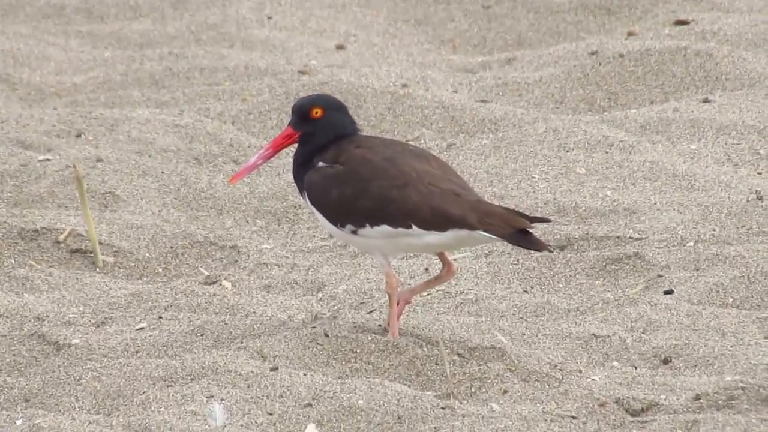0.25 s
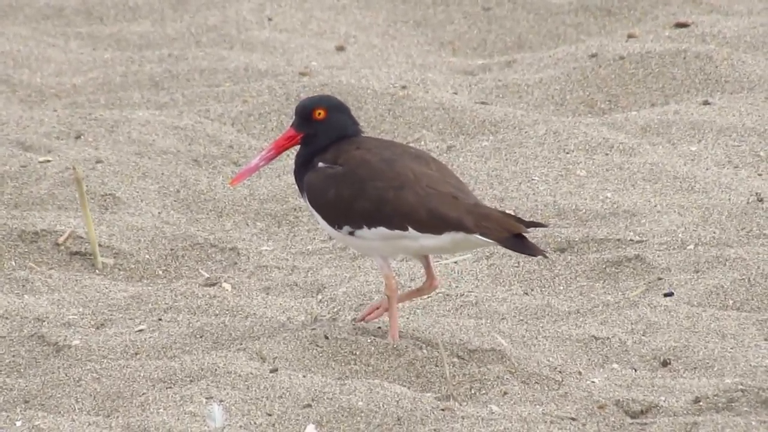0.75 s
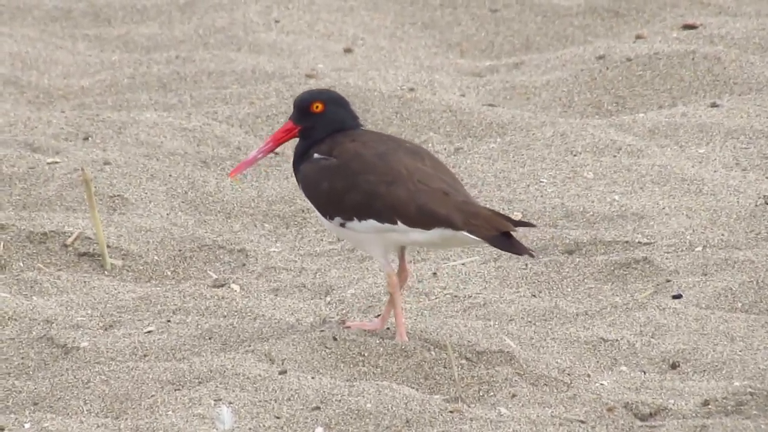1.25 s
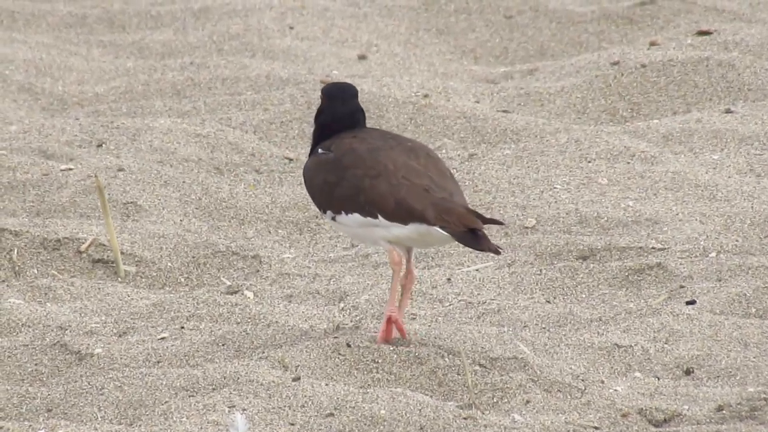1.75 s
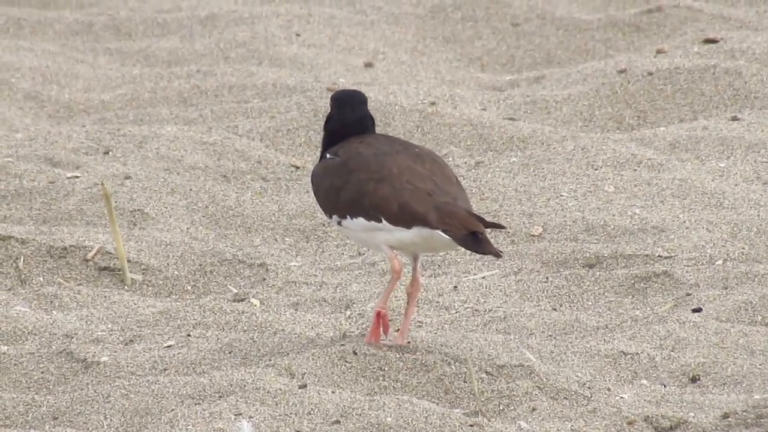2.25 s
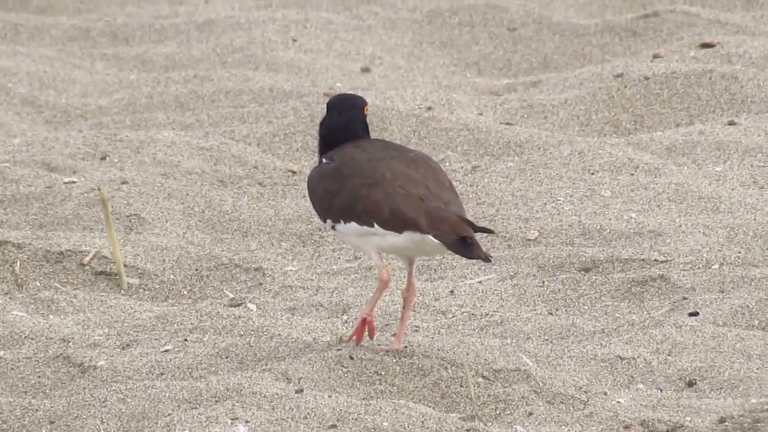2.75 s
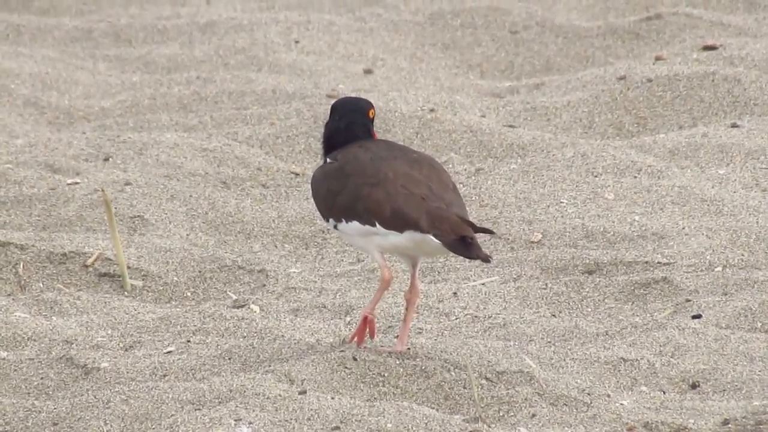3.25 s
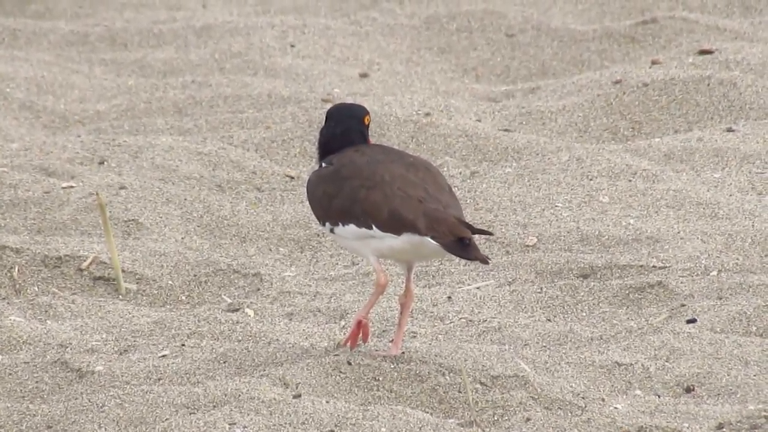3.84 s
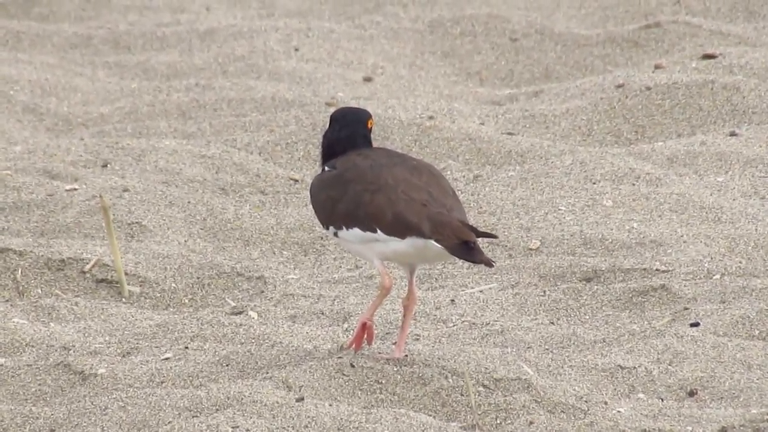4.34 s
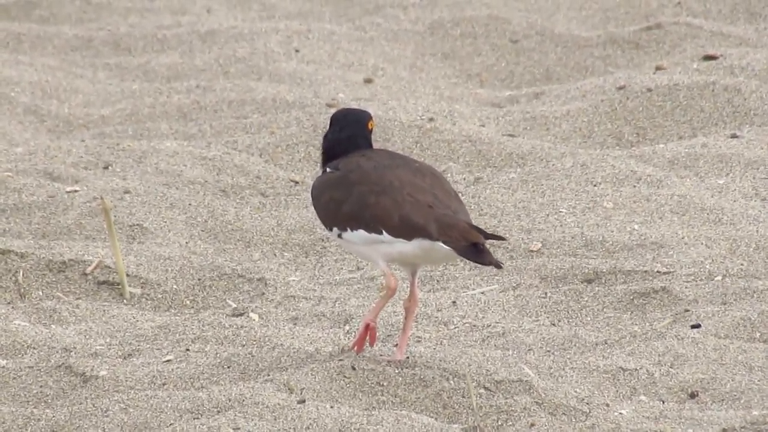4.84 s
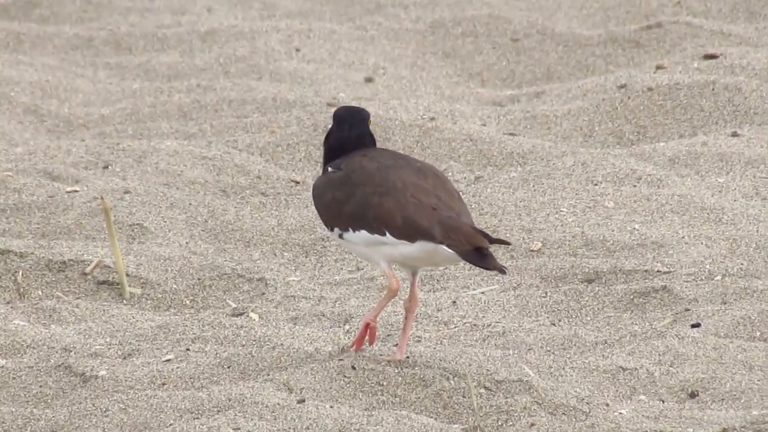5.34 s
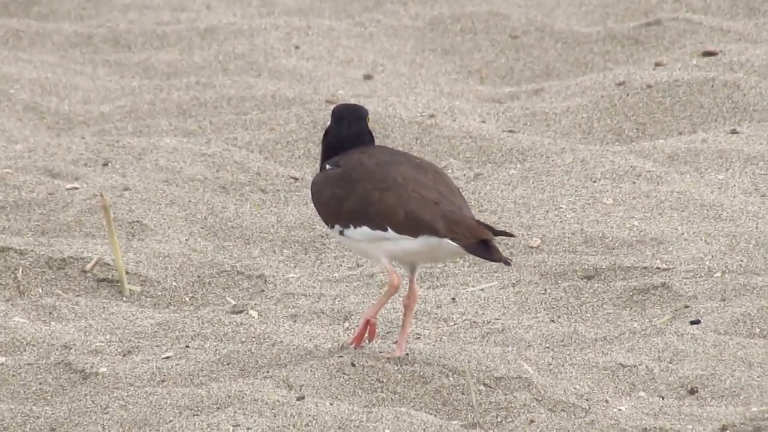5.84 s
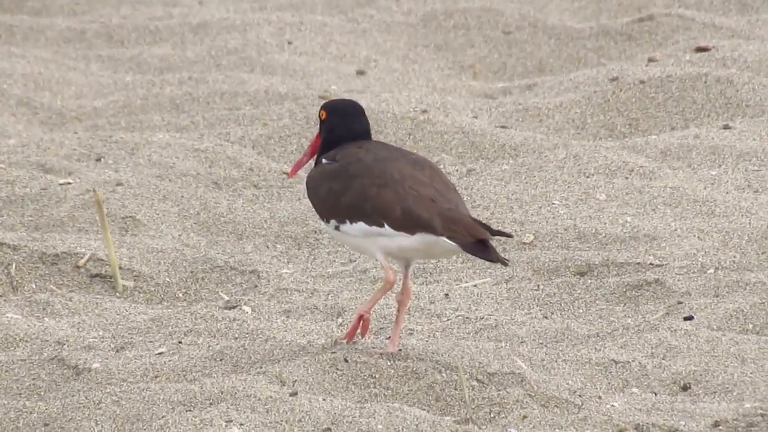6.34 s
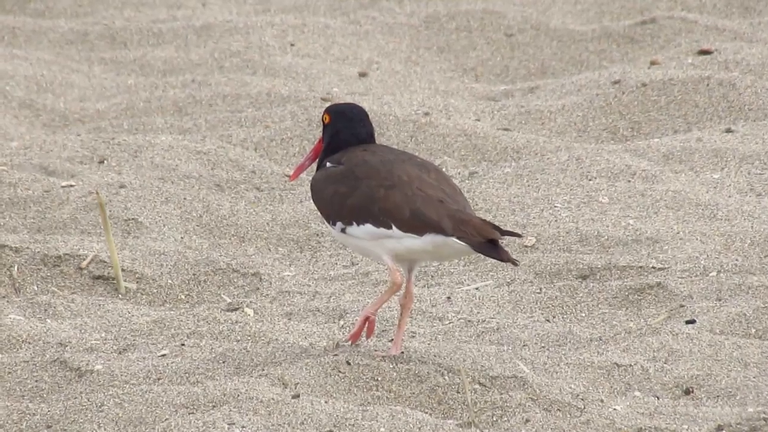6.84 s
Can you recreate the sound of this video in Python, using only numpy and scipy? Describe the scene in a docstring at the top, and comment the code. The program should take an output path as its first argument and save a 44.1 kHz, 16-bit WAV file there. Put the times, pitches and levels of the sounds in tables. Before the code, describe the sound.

Shorebirds give loud piping whistles over gusty wind rumbling on the microphone and a faint wash of surf.

```python
"""A windy beach, stereo microphone out in the open. Oystercatchers pipe close by: eight loud whistles,
each breaking out of a low creak and dropping back into a low sigh. Further along the shore, birds answer
with short pips, thin whistles and a climbing trill. Wind buffets the microphone over a wash of surf;
one hard gust overloads it and makes the limiter duck everything."""
import sys
import numpy as np
from scipy import signal
from scipy.fft import rfft, irfft
from scipy.io import wavfile
from scipy.ndimage import uniform_filter1d

SR = 44100
rng = np.random.default_rng(int(sys.argv[2]) if len(sys.argv) > 2 else 0)


def materialize(psi):
    """Save the field psi as 16-bit PCM at rate SR to the path in sys.argv[1].

    A 1-D psi becomes a single channel; in a 2-D psi each row is a channel.
    """
    bounded = np.clip(np.atleast_2d(psi).T, -1, 1)
    quanta = np.round(bounded * 32767).astype(np.int16)
    wavfile.write(sys.argv[1], SR, quanta)


N = 313110
TIME = np.arange(N) / SR

# Throat resonances that colour the low register. Each row: centre in Hz, width in Hz, gain in dB.
THROAT_RESONANCES = [(1990, 1500, 0), (3850, 2650, 1), (7260, 4100, -17)]
# How the microphone's two ports hear bearings 0 and 1 (near birds) and 2 (far birds), one list each.
# Each row: frequency in Hz, left minus right in dB, left phase lead in radians.
MIC_BEARINGS = [
    [(1500, 6, 1.2), (2500, 10, 1.9), (3600, 5, .6), (5100, 1.7, -.3), (7600, 2.5, 1.4), (10200, -.5, 1.6),
     (12800, 2, 2.2)],
    [(1500, 6, 2.2), (2450, 9, 3.3), (3600, 8, 1.8), (4900, 9.3, 1.6), (7400, 6.5, 2.6), (9900, 2, 3.0),
     (12400, 1, 3.9)],
    [(2300, 10, 2.5), (4600, 7, .2), (7100, 7, 1.7)],
]
# The strongest eddies to hit the microphone. Each row: time in seconds, peak pressure,
# half width in seconds, rise of the wind around it in dB.
MIC_EDDIES = [(.19, 0.38, 0.0011, 3), (0.6681, -.95, .00085, 6.5), (0.7807, -0.73, .0012, 2.5),
              (1.19, 0.93, 0.0016, 4.5), (1.855, 0.74, 0.0012, 5), (1.9803, .35, 0.0012, 7.5),
              (2.232, .3, 0.00092, 1.5), (3.3057, 0.64, 0.0015, 1), (3.5538, 1, 0.0014, 6.5),
              (3.791, 0.58, 0.0011, 0.5), (3.921, 0.93, 0.0021, 1.5), (4.092, 0.58, 0.0012, 4.5),
              (4.2102, -0.59, .0011, 4.5), (4.264, -.4, 0.00098, 6.5), (4.475, 0.77, 0.0012, 7.5),
              (5.5794, 0.5, 0.0011, 2.5), (5.926, 0.42, .0008, 3), (6.209, 1, 0.0013, 1)]


def near_birds(break_hz=2200):
    """Oystercatchers close to the microphone: each call is creak, whistle and sigh."""
    # One pitch curve per whistle. Each point: time in seconds, pitch in Hz.
    pitch_curves = [
        [(0.52, 2495), (0.544, 2539), (0.578, 2533), (0.606, 2622), (0.638, 2625), (0.71, 2557), (0.742, 2459),
         (0.757, 2374)],
        [(1.384, 2420), (1.418, 2550), (1.456, 2627), (1.474, 2510), (1.498, 2507), (1.544, 2230),
         (1.554, 2233)],
        [(1.837, 2454), (1.873, 2676), (1.895, 2665), (1.921, 2548), (1.939, 2626), (1.997, 2628),
         (2.033, 2586), (2.057, 2520), (2.08, 2291)],
        [(3.035, 2400), (3.055, 2600), (3.081, 2515), (3.109, 2606), (3.123, 2460), (3.137, 2420),
         (3.175, 2163), (3.186, 2190)],
        [(3.74, 2354), (3.78, 2490), (3.786, 2560), (3.826, 2590), (3.876, 2590), (3.932, 2450), (3.942, 2340),
         (3.952, 2340)],
        [(4.728, 2460), (4.736, 2500), (4.758, 2593), (4.832, 2540), (4.85, 2474), (4.88, 2190), (4.904, 2130)],
        [(6.55, 2330), (6.574, 2444), (6.604, 2470), (6.648, 2440), (6.718, 1995), (6.73, 1975), (6.742, 1920)],
        [(6.898, 2319), (6.932, 2474), (6.978, 2550), (6.998, 2481), (7.026, 2487), (7.1, 2345)],
    ]
    # Each row, in dB: fundamental, second harmonic against it, slope per harmonic above that, lift from
    # the fifth up, swell over the call, overtones' gain over the call; last, the bearing.
    whistle_colours = [(-52, -2, -10.5, -3, 4, -3, 0), (-41, 0, -9, -10, 3, -9, 0),
                       (-42.5, -6.5, -8.5, -2, -11.5, 22, 0), (-36.5, -0.5, -8.2, 3, 0, -1, 0),
                       (-35.5, -6, -12.5, 1, -2, -2.5, 0), (-35, -2, -3.5, -8, 1, -3, 0),
                       (-40, 8.5, -7, -5, -4, 7, 1), (-37, -1, -11, 14, 0.5, 3, 1)]
    # The low register around each whistle. Each row: lead-in in seconds, levels of creak, rising voice
    # and sigh in dB, tilt in dB per harmonic.
    low_register = [(0.046, -51, -70, -64, 0), (.1, -46.5, -55, -53, -1), (0.083, -54, -51.5, -59, 0),
                    (0.086, -42, -50, -48.5, -7.5), (.095, -46.5, -49, -52.5, -4),
                    (0.082, -39, -46.5, -60, -5), (.085, -36, -45, -41.5, -5), (.08, -38, -32, -60, 0)]
    out = np.zeros((2, N))
    for curve, (*colour, bearing), low in zip(pitch_curves, whistle_colours, low_register):
        lead_s, creak_db, rise_db, sigh_db, tilt_db = low
        (start, _), (end, end_hz) = curve[0], curve[-1]
        add(out, *lead_in(start, lead_s, creak_db, rise_db, tilt_db, bearing))
        add(out, *whistle(curve, *colour, bearing))
        add(out, *sigh(end, min(end_hz, break_hz), sigh_db, tilt_db, bearing))
    return out


def whistle(curve, db, second_db, slope_db, shrill_db, swell_db, opening_db, bearing,
            jump=.1, jump_s=.0014, effort_db_per_oct=26, dull_db_per_oct=140):
    """High register: the pitch leaps into a clean arch and drops out, weaker and duller as it sinks."""
    times, pitch = np.transpose(curve)
    t = np.arange(times[0] - .001, times[-1] + .0015, 1 / SR)
    leap = 1 - jump * (np.exp((t[0] - t) / jump_s) + np.exp((t - t[-1]) / jump_s))
    held_hz = uniform_filter1d(np.interp(t, times, pitch), size=600)
    hz = leap * held_hz * (1 + .002 * drift(len(t), 160))
    progress = np.linspace(-.5, .5, len(t))
    sunk_oct = np.log2(held_hz.max() / held_hz)
    effort_db = db + swell_db * progress - effort_db_per_oct * sunk_oct
    overtone_db = second_db + opening_db * progress
    dull_db = dull_db_per_oct * np.maximum(sunk_oct - .12, 0)
    lifts_db = [0, 0, shrill_db, shrill_db - 10]  # harmonics 3 to 6
    upper_db = [overtone_db + slope_db * k + lift - dull_db for k, lift in enumerate(lifts_db, 1)]
    gains = []
    for k, colour_db in enumerate([0, overtone_db] + upper_db, 1):
        waver_db = .75 * drift(len(t), 90) + k * drift(len(t), 11.5)  # high harmonics waver most
        gains.append(amp(effort_db + colour_db + waver_db))
    return t[0], voice(hz, gains, bearing) * fade(t, .002, .0013)


def lead_in(end, length, creak_db, rise_db, tilt_db, bearing, from_hz=1060, to_hz=1830, flutter_db=4.5):
    """A rising low voice: a creak with a doubled period, a catch midway, then clean up to the break."""
    t = np.arange(end - length, end + .0011, 1 / SR)
    progress = np.linspace(0, 1, len(t))
    hz = from_hz + (to_hz - from_hz) * progress ** .8
    creak_hz = hz / 2 * (1 + .018 * drift(len(t), 45))
    gains = throat(creak_hz, count=14)
    gains[::2] *= amp(-8)  # the partials that period doubling adds are weaker
    gains *= amp(flutter_db * np.array([drift(len(t), 110) for _ in gains]))
    roughness = .21 + .37 * np.exp(-((progress - .55) / .09) ** 2)
    creak = voice(creak_hz, gains, bearing) + roughness * rasp(creak_hz, bearing)
    creak *= amp(creak_db - 26 * abs(progress - .5)) * fade(progress, .14, .82)
    swell = amp(rise_db - 2) * fade(progress, .75, .03) ** 4
    clean_hz = hz * (1 + .01 * drift(len(t), 200))
    clean = voice(clean_hz, throat(hz, count=5, tilt_db=tilt_db) * swell, bearing)
    return t[0], creak + clean


def sigh(start, pitch_hz, db, tilt_db, bearing, length=.056, drop=.79, sag=.13,
         decay_db=13, crack_db=-6, crack_s=.011):
    """The whistle cracks back into the low register and sinks away."""
    t = np.arange(0, length, 1 / SR)
    hz = drop * pitch_hz * (1 - sag * t / length) * (1 + .012 * drift(len(t), 150))
    decay = amp(1.5 * drift(len(t), 120) - decay_db * t / length)
    tone = voice(hz, throat(hz, count=5, tilt_db=tilt_db) * decay, bearing)
    crack = rasp(hz / 2, bearing) * amp(crack_db) * np.exp(-t / crack_s)
    return start, amp(db) * (tone + crack) * fade(t, .001, .015)


def voice(hz, levels, bearing):
    """Harmonics of a gliding pitch at the given rms gains, as the two ports hear them."""
    phase, out = 2 * np.pi * np.cumsum(hz) / SR, 0
    for k, level in enumerate(levels, 1):
        side_db, lead = read(MIC_BEARINGS[bearing], k * hz)
        pair = np.array([amp(side_db) * np.sin(k * phase + lead), np.sin(k * phase)])
        out = out + 2 * level * (k * hz < SR / 2) * pair / np.sqrt(1 + amp(side_db) ** 2)
    return out


def throat(hz, count, tilt_db=0):
    """Gains of the harmonics of hz through the throat, tilted by tilt_db per harmonic; total power 1."""
    k = np.arange(1, count + 1)[:, None]
    gains = amp(tilt_db * k) * sum(amp(db) / (1 + (2 * (k * hz - centre) / width) ** 2) ** 2
                                   for centre, width, db in THROAT_RESONANCES)
    return gains / np.sqrt((gains ** 2).sum(0))


def rasp(hz, bearing):
    """Uneven slaps of the membranes, one a cycle, ring the throat; rms 1 over both ports."""
    cycles = np.cumsum(hz * (1 + .23 * drift(len(hz), 590))) / SR
    slaps = np.diff(np.floor(cycles), prepend=0) * amp(5 * drift(len(hz), 600))
    bins_hz = np.fft.rfftfreq(len(hz), 1 / SR)
    rung = rfft(slaps) * sum(amp(db) / (1 + 2j * (bins_hz - centre) / width) ** 2
                             for centre, width, db in THROAT_RESONANCES)
    side_db, lead = read(MIC_BEARINGS[bearing], bins_hz)
    return unit(irfft(np.array([rung * amp(side_db) * np.exp(1j * lead), rung]), len(hz)))


def trill(count=13, start_s=5.272, gap_s=.082, slowing_s=.0023, from_hz=2050, step_hz=23.2):
    """One distant bird's run of low pips climbs and slows, loudest in the middle."""
    # The middle note: levels of harmonics 1 to 3 in dB.
    middle_db = [-47, -62, -67]
    out = np.zeros((2, N))
    for n, place in enumerate(np.linspace(-1, 1, count)):
        start = start_s + gap_s * n + slowing_s * n ** 2 / 2
        levels_db = np.array(middle_db) - 6.5 * place ** 2
        add(out, start, far_note(from_hz + step_hz * n, levels_db, length=.03))
    return out


def flock(faint_per_s=2.2, faint_hz=2340, faint_db=-66.5):
    """Pips and thin whistles from further along the shore; the faintest pips come at random."""
    # The clearest pips. Each row: start in seconds, pitch in Hz, level in dB, slope in dB per harmonic.
    pips = [(.19, 2460, -52.5, -6), (.388, 2450, -52, -6.5), (.91, 2490, -54, -11), (1.732, 2400, -54, -8),
            (2.613, 2384, -59, -4), (2.812, 2390, -58, -7), (3.368, 2408, -53, -3.5),
            (3.439, 2410, -56.5, -2), (3.649, 2410, -52.5, -7), (3.992, 2372, -59.5, -3),
            (4.186, 2370, -62, 0), (4.255, 2312, -55, -4.5), (4.479, 2408, -54, -4), (4.55, 2384, -58, -5),
            (5.396, 2390, -57.5, -8), (5.654, 2360, -57, -8), (5.922, 2420, -60, -3), (5.994, 2320, -64, 2)]
    # Each row: start in seconds, length in seconds, pitch in Hz, level in dB.
    thin_whistles = [(0.22, .21, 2680, -69), (1.036, 0.18, 2320, -61.5), (2.657, .17, 2570, -70),
                     (4.15, .165, 2350, -58), (4.998, 0.21, 2720, -67)]
    # Harmonics 1 to 3 of a thin whistle, in dB against its level.
    thin_colour = [-2.5, -0.5, -18]
    out = np.zeros((2, N))
    for start, hz, db, slope_db in pips:
        add(out, start, far_note(hz, db + slope_db * np.arange(3)))
    for start, length, hz, db in thin_whistles:
        add(out, start, far_note(hz, db + np.array(thin_colour), length, droop=.16, top=.52, waver_db=2.5))
    for when, high, loud in rng.random((round(faint_per_s * N / SR), 3)):
        levels_db = np.full(3, faint_db + 2 * (2 * loud - 1))
        add(out, when * N / SR, far_note(faint_hz + 50 * (2 * high - 1), levels_db))
    return out


def far_note(pitch_hz, levels_db, length=.04, droop=.2, top=.3, waver_db=1):
    """A distant note, a pip by default, highest at fraction top of its length; moving air wavers it."""
    progress = np.linspace(0, 1, int(length * SR))
    hz = pitch_hz * (1 - droop * (progress - top) ** 2) * (1 + .0026 * drift(len(progress), 120))
    gains = [amp(db + waver_db * drift(len(progress), 50)) for db in levels_db]
    return voice(hz, gains, bearing=2) * fade(progress, .25, .29)


def sand_scatter(birds, wet_db=-31, t60_s=.32):
    """The calls scatter faintly off the open sand."""
    t = np.arange(SR // 2) / SR
    tail = rng.standard_normal((2, len(t))) * amp(-60 * t / t60_s) * (t > .006)
    tail /= np.linalg.norm(tail, axis=1, keepdims=True)
    return amp(wet_db) * signal.fftconvolve(birds, tail, axes=1)[:, :N]


def wind(surge_db=1.5, eddy_gust_s=.019, left_share=.46, left_own_db=-16):
    """Gusts and eddies drive the two ports in opposite sense; a little turbulence is the left's own."""
    # Wind pressure on the right port before surges. Each row: time in seconds, rms level in dB.
    wind_curve = [(0, -21), (.5, -17.5), (.8, -16), (.9, -20.5), (1.1, -17.5), (1.36, -19.5), (1.74, -18),
                  (1.92, -19), (2.12, -14), (2.2, -16), (2.45, -17.5), (2.86, -19.5), (3.38, -13),
                  (3.48, -18), (3.7, -19), (3.9, -13.5), (4.05, -18.5), (4.55, -21.5), (4.9, -16.5),
                  (5.14, -17.5), (5.3, -22), (5.62, -14.5), (5.76, -21), (5.98, -16.5), (6.45, -18.5),
                  (7.1, -15.5)]
    force_db = np.interp(TIME, *np.transpose(wind_curve)) + surge_db * drift(N, 9.1)
    force_db += sum(rise_db * np.exp(-((TIME - s) / eddy_gust_s) ** 2) for s, *_, rise_db in MIC_EDDIES)
    force = amp(force_db)
    pressure = force * turbulence(force_db) + buffet()
    for s, peak, width, _ in MIC_EDDIES:
        near = slice(int((s - .03) * SR), int((s + .03) * SR))
        offset = (TIME[near] - s) / width
        core = 1 / (1 + offset ** 2)  # a vortex core displaces the turbulence around it
        pressure[near] = pressure[near] * (1 - core) + peak * (1 - offset ** 2) * core ** 2
    left = -left_share * pressure + amp(left_own_db) * force * turbulence(force_db)
    return np.array([left, pressure])


def turbulence(force_db, split_hz=330, brighten=.75, wake_db=5, wake_s=.0053):
    """Lumpy low noise of steady strength, brighter when the wind blows harder and around each eddy."""
    # Wind rumble on the microphone. Each row: frequency in Hz, relative spectral level in dB.
    rumble = [(10, -35), (25, -12.5), (55, -2), (95, 2), (200, -2.5), (300, -9.5), (420, -17), (600, -29),
              (900, -43), (1500, -82), (4000, -81)]
    hz = np.fft.rfftfreq(N, 1 / SR)
    spectrum = rfft(rng.standard_normal(N)) * amp(read(rumble, hz)[0])
    low = irfft(spectrum / (1 + (hz / split_hz) ** 4), N)
    high = irfft(spectrum, N) - low
    lumps = 2 * np.tanh(drift(N, 47.6) / 2)
    wakes = np.minimum(sum(1 / (1 + ((TIME - s) / wake_s) ** 2) for s, *_ in MIC_EDDIES), 1)
    high_db = 6.5 * lumps + brighten * force_db + wake_db * wakes
    flow = low * unit(amp(2 * lumps)) + high * unit(amp(high_db))
    power = uniform_filter1d(uniform_filter1d(flow ** 2, size=3000), size=3000)
    return flow / np.sqrt(power + 1e-20)


def buffet(at_s=2.2548, strength=7.6, width_s=.0011):
    """A vortex passes right across the microphone: a suction, then a push, hard enough to overload it."""
    offset = (TIME - at_s) / width_s
    return strength * offset / (1 + offset ** 2) ** 2


def surf(level_db=-48.5, swell_db=1.05, flicker_db=.73):
    """A broad, slowly swelling wash from the sea, behind everything else."""
    # Colour of the wash. Each row: frequency in Hz, relative spectral level in dB.
    wash_spectrum = [(60, -0.5), (300, -1.5), (750, 8.5), (1150, 0), (1700, -0.5), (2400, 0.5), (3200, -8),
                     (4500, -9.5), (6000, -11.5), (7500, -15), (10000, -21), (13000, -29.5), (15800, -34)]
    # Surf at the two ports. Each row: frequency in Hz, correlation from -1 to 1, left minus right in dB.
    stereo_image = [(200, -0.61, 14), (704, 0.24, -2), (1320, 0.44, -2.5), (2500, -0.016, -0.5),
                    (4400, 0.43, 3.5), (7000, 0.27, -3), (15000, -0.27, 2)]
    hz = np.fft.rfftfreq(N, 1 / SR)
    left, independent = rfft(rng.standard_normal((2, N)))
    likeness, side_db = read(stereo_image, hz)
    right = likeness * left + np.sqrt(1 - likeness ** 2) * independent
    pair = np.array([left * amp(side_db / 2), right * amp(-side_db / 2)])
    wash = unit(irfft(pair * amp(read(wash_spectrum, hz)[0]), N))
    return wash * amp(level_db + swell_db * drift(N, 1.9) + flicker_db * drift(N, 27))


def amp(db):
    """Decibels to gain."""
    return 10 ** (np.asarray(db) / 20)


def unit(x):
    """Scales to rms 1."""
    return x / np.sqrt(np.mean(x ** 2) + 1e-20)


def read(table, hz):
    """Every column of a table at hz, on a log-frequency axis."""
    row_hz, *columns = np.transpose(table)
    return [np.interp(np.log(hz + 1), np.log(row_hz + 1), column) for column in columns]


def drift(size, rate_hz):
    """A smooth random wander of rms about 1 that moves up to rate_hz."""
    padded = size + SR // 4
    hz = np.fft.rfftfreq(padded, 1 / SR)
    return unit(irfft(rfft(rng.standard_normal(padded)) * np.exp(-(hz / rate_hz) ** 2)))[:size]


def fade(t, rise, fall):
    """Smooth gate over the times t."""
    return np.sin(np.pi / 2 * np.clip((t - t[0]) / rise, 0, 1) * np.clip((t[-1] - t) / fall, 0, 1)) ** 2


def add(mix, start_s, sound):
    """Mixes a stereo sound in at start_s."""
    part = mix[:, max(round(start_s * SR), 0):][:, :sound.shape[1]]
    part += sound[:, :part.shape[1]]


def scene():
    """Birds, surf and wind at the microphone."""
    weather = surf() + wind()
    birds = near_birds() + trill() + flock()
    return birds + sand_scatter(birds) + weather


def record(dry, recover_db_per_s=18, attack_s=.00046, edge_hz=15850):
    """A fast limiter with slow recovery, hard clipping of what slips past it, then the band limit."""
    over_db = np.maximum(20 * np.log10(abs(dry).max(0) + 1e-9), 0)
    recovery_db = recover_db_per_s * TIME
    held_db = np.maximum.accumulate(over_db + recovery_db) - recovery_db
    lag = np.exp(-1 / (attack_s * SR))
    duck_db = signal.lfilter([1 - lag], [1, -lag], held_db)
    limited = np.clip(dry * amp(-duck_db), -1, 1)
    lowpass = signal.firwin(511, edge_hz, window=("kaiser", 9), fs=SR)
    return signal.oaconvolve(limited, lowpass[None], "same")


dry = scene()
out = record(dry)
materialize(out)
```